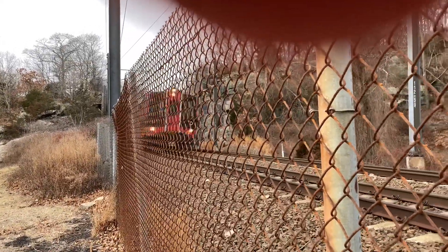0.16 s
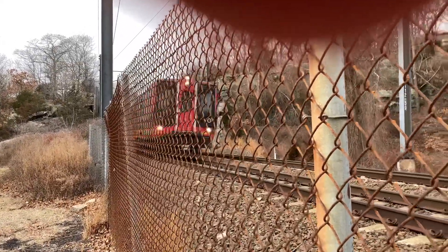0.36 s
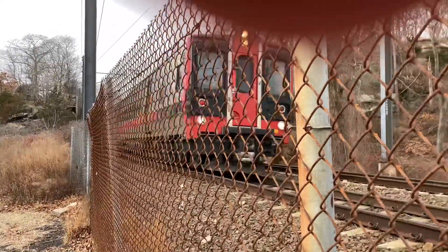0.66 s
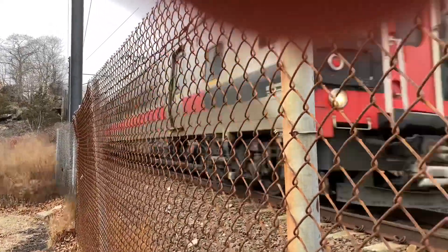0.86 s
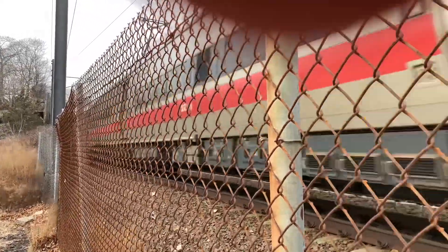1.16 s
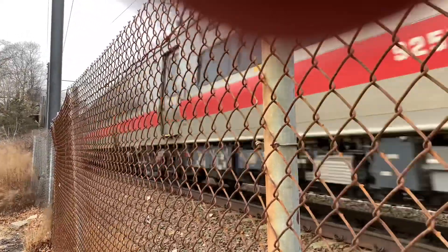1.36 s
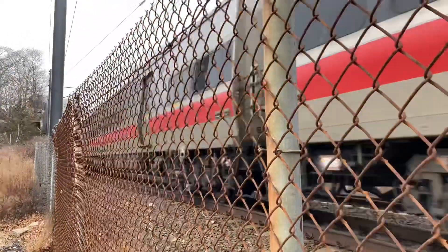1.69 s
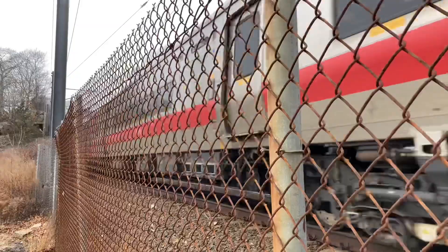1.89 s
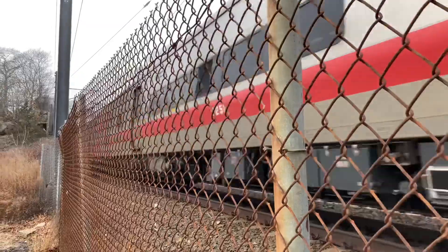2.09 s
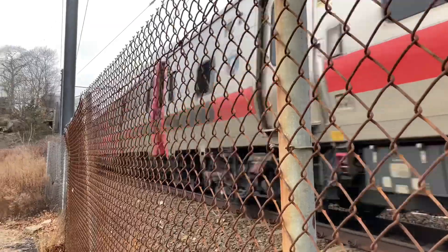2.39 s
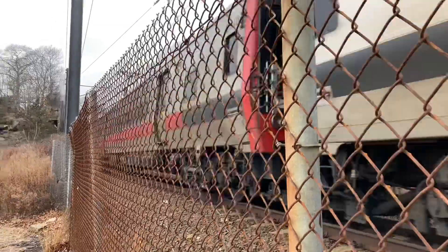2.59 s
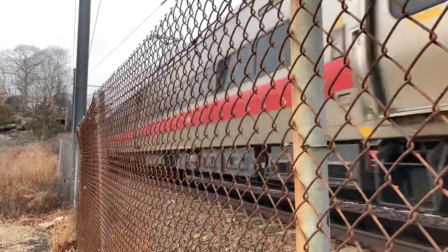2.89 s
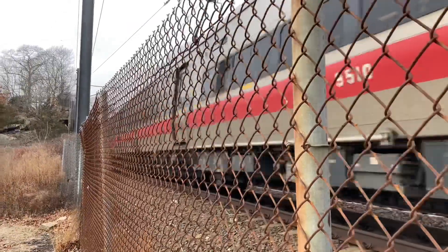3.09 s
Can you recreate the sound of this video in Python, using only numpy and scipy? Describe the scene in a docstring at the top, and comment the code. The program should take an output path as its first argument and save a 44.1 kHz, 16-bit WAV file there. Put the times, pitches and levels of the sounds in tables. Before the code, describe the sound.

Electric passenger train roars past very close, a flat wheel spot knocking rapidly on the rail

```python
"""Heard first is a wheel knocking over and over through the roar of an electric train running past at 26 m/s,
its axles 6 m from a two-port microphone by a wire fence. Roar, rail song, sleeper boom and ballast drone
are shaped noise; a flat spot on a wheel strikes sagging notes, thuds and clatter. Gear notes slide down
as axles pass, motors whine, loose metal rings, dragged air rumbles and hisses, and a brief bright click sounds."""
import sys
import numpy as np
from scipy import signal
from scipy.fft import rfft, irfft
from scipy.io import wavfile
from scipy.ndimage import map_coordinates

SR = 44100
rng = np.random.default_rng(int(sys.argv[2]) if len(sys.argv) > 2 else 0)


def how_loud(loudness_db):
    """Turn decibels into a plain amplitude multiplier (0 dB gives 1, 20 dB gives 10)."""
    steps = np.asarray(loudness_db, float) / 20
    return 10 ** steps


def int16_out(signal):
    """Quantize to a 16-bit WAV file."""
    q = np.round(np.clip(np.atleast_2d(signal).T, -1, 1) * 32767)
    wavfile.write(sys.argv[1], SR, q.astype(np.int16))


N = 143325
T = np.arange(N) / SR
HZ = np.fft.rfftfreq(N, 1 / SR) + 1e-3   # kept off zero for the logarithm

# Levels are relative, before the trims in the functions.
# moving air: [t/s, rumble level/dB, hiss level/dB, sizzle level/dB]
AIR_LEVELS = [(0.0, -38, -44, -36), (0.09, -30.5, -40, -35), (0.9, -20.5, -34.5, -35.5),
              (1.27, -27.5, -43, -42), (1.88, -35.5, -34.5, -38.5), (2.13, -30, -42, -43.5),
              (2.58, -35, -35.5, -41.5), (2.87, -38, -37.5, -42), (2.94, -31, -37, -43),
              (2.97, -32, -44, -44), (3.13, -28.5, -43, -45), (3.25, -42, -43, -42)]
# colours of the air: [f/Hz, level/dB]
RUMBLE_COLOUR = [(24, -39), (36, -18), (60, -6.5), (90, -9.5), (130, -12.5), (200, -22.5)]
HISS_COLOUR = [(4500, -51), (5800, 1.5), (7000, 5), (8500, 5), (9500, 3.5), (10500, 4)]
SIZZLE_COLOUR = [(8000, -2), (9200, -5), (11200, 5), (12300, -1), (13500, -4), (14500, -1), (16000, -19)]
# brief bright clicks: [t/s, level/dB]; their colour: [f/Hz, level/dB]
BRIGHT_CLICKS = [(0.3905, -15), (.3935, -21)]
CLICK_COLOUR = [(6000, -25), (8500, -16), (11500, 5), (15000, -6), (16500, -20)]
# loose metal parts ringing: [t/s, level/dB, f/Hz]
METAL_RINGS = [(2.125, -27.5, 5400), (2.6, -30, 5480), (2.6, -31, 4700), (3.015, -27, 5340)]
# geared axles going by: [t of closest approach/s, level/dB, f at the source/Hz]
AXLE_PASSES = [(0.722, -48, 2870), (0.961, -28.5, 3005), (1.099, -35.5, 2770), (1.102, -37, 3310),
               (1.662, -34.5, 2870), (1.72, -36, 3467), (1.93, -30.5, 2940), (1.85, -32.5, 3330),
               (2.629, -38, 2880), (2.929, -33.5, 2900)]
# nearness of the motors: [t/s, whine level/dB, gear rush level/dB]
MOTOR_LEVELS = [(0.0, -45.5, -42), (0.6, -44.5, -35.5), (0.7, -41, -33.5), (0.89, -33, -30),
                (1.05, -30, -31.5), (1.19, -31.5, -35), (1.53, -43, -39), (1.59, -34, -32.5),
                (1.79, -38, -32), (1.99, -34, -32.5), (2.06, -33.5, -34.5), (2.22, -45, -41.5),
                (2.45, -47, -38), (2.67, -31, -33.5), (2.78, -45, -33.5), (2.93, -33, -34),
                (3.09, -32.5, -41), (3.16, -43, -40)]
# whine resonances: [f/Hz, width/Hz, level/dB]; colour of the rush: [f/Hz, level/dB]
WHINE_PEAKS = [(2852, 53, 1), (3374, 29, -9), (7310, 77, -11)]
RUSH_COLOUR = [(1050, -55), (1450, 10.5), (1950, -16), (2350, -1.5), (2900, 1.5), (3400, 1.5), (4200, -1),
               (5200, 0.5), (6500, -5), (8000, -15)]
# nearness of the wheels: [t/s, roar level/dB, rail song level/dB, sleeper boom level/dB, ballast drone level/dB]
WHEEL_LEVELS = [(0, -26, -29, -38, -42.5), (.08, -29.5, -24, -35.5, -48), (.55, -24.5, -22, -29.5, -44),
                (.68, -24.5, -15, -26, -37.5), (.8, -22.5, -17, -24, -32.5),
                (.87, -21.5, -20.5, -15, -29.5), (.97, -21, -24, -22.5, -25.5),
                (1.16, -26.5, -30.5, -18.5, -50), (1.4, -24.5, -27.5, -28, -36),
                (1.7, -19, -27.5, -25.5, -30.5), (1.9, -23.5, -26, -20.5, -29.5),
                (2.2, -25.5, -28.5, -45, -37.5), (2.43, -23.5, -33.5, -30, -34.5),
                (2.6, -21.5, -28, -31, -33), (2.73, -19, -22.5, -16.5, -28.5), (2.92, -24, -48, -12, -28),
                (3.06, -28.5, -30.5, -24.5, -32.5), (3.25, -24.5, -28, -60, -39)]
# colours of rolling: [f/Hz, level/dB]
ROAR_COLOUR = [(330, -9), (420, -1.5), (700, -1), (1050, 1), (1400, -3.5), (1950, -3.5), (2300, -17.5),
               (3000, -27.5)]
BALLAST_COLOUR = [(80, -6.5), (125, -5.5), (200, 4), (330, -3.5), (420, -4.5), (520, -14.5)]
# resonances fed by rough rolling: [f/Hz, width/Hz, level/dB]
RAIL_PEAKS = [(480.5, 55, 1.5), (600, 54, -7), (1076, 29, -11)]
SLEEPER_PEAKS = [(189, 26, 4.5), (209, 95, 4), (245, 28.5, 8.5)]
# wheel-flat knocks: [t/s, peak level/dB, nominal f/Hz, thud level/dB, clatter level/dB]
FLAT_KNOCKS = [(0.081, -10, 1170, -40, -36), (0.118, -15.5, 478, -31, -40), (0.18, -8, 858, -40, -46),
               (0.229, -15, 977, -30, -48), (0.278, -15, 720, -39, -50), (0.332, -16, 610, -18.5, -41),
               (0.371, -6, 700, -26, -50), (0.469, -33, 510, -17.5, -26), (0.561, -10.5, 600, -15, -28),
               (0.657, -5, 610, -12, -35), (0.681, -27, 470, -23, -39), (0.709, -8.5, 780, -19, -29),
               (0.754, -7.5, 600, -12.5, -39), (0.811, -12, 506, -28, -23), (0.848, -9.5, 600, -19, -33),
               (0.896, -7.5, 680, -8, -17.5), (0.988, -7.5, 750, -8.5, -26), (1.082, -8, 783, -10.5, -20),
               (1.18, -12.5, 630, -12, -23), (1.274, -22, 635, -13, -26), (1.367, -12, 647, -35, -24),
               (1.473, -12.5, 547, -27, -19.5), (1.557, -7, 590, -14, -19), (1.65, -11, 917, -29, -18),
               (1.765, -5, 597, -7.5, -18.5), (1.855, -4.5, 552, -11, -23),
               (1.933, -5.5, 732, -15.5, -19.5), (2.023, -22, 816, -13, -39),
               (2.117, -15.5, 827, -15.5, -26), (2.153, -8.5, 580, -16, -39), (2.243, -6.5, 593, -18, -26),
               (2.341, -8, 525, -12, -21), (2.423, -9.5, 733, -7.5, -21.5), (2.513, -5.5, 614, -3, -21),
               (2.603, -11, 630, -7.5, -23), (2.701, -17, 587, -9.5, -42), (2.739, -6, 513, -21, -30),
               (2.812, -10, 500, -7.5, -22), (2.916, -12, 600, -5, -19.5), (3.019, -4.5, 595, -12, -29.5),
               (3.112, -7.5, 594, -11, -24), (3.213, -10, 934, -12.5, -27)]
# overtones of a knock: [multiple of the note, level/dB]
KNOCK_OVERTONES = [(1.3, -7.5), (1.65, -8.5), (2.1, -14.5)]
# colours of a knock: [f/Hz, level/dB]
KNOCK_COLOUR = [(250, -9), (450, -8), (650, 4.5), (950, 4.5), (1400, 0.5), (2000, -9.5)]
THUD_COLOUR = [(90, -4.5), (150, 7), (220, 1), (380, 4.5), (550, -11)]
CLATTER_COLOUR = [(900, -7.5), (1400, 9.5), (2000, -0.5), (3200, -10), (6000, -11), (11000, -20),
                  (15000, -35)]
# power share of the sound that comes straight to both ports: [f/Hz, share 0-1]
DIRECT_SHARE = [(30, .965), (90, .97), (250, .95), (640, .9), (1400, .65), (2800, .5), (4500, .4),
                (6000, .6), (7000, .97), (11000, .98)]
# bearing of the direct sound below the crossover: [t/s, lag of the left port/ms]
LEFT_LAG = [(0, -0.17), (.5, -0.14), (.8, 0.018), (1.1, 0.34), (2, 0.31), (3.25, 0.35)]
# phase by which the left port trails in the treble, in steps: [f/Hz, phase/turns]
TREBLE_PHASE = [(3500, 1.05), (5100, 1.52), (6450, 1.97), (7450, 2.03), (8400, 2.46), (9600, 2.53),
                (10600, 2.96), (12200, 3.03), (12800, 3.46), (14300, 3.54), (14900, 3.96), (17000, 4.02)]
# balance of the ports: [f/Hz, left minus right level/dB]
PORT_BALANCE = [(60, -1), (110, 0.5), (200, 0), (380, 2.5), (700, -3.5), (1290, 1.5), (2380, -0.5),
                (4400, 2.5), (8120, -1.5), (15000, 2.5)]


def rms_one(x):
    """Scale to unit rms."""
    return x / np.sqrt(np.mean(x ** 2) + 1e-20)


def in_time(rows):
    """Columns of a table as curves over time."""
    s, *columns = np.transpose(rows)
    return [np.interp(T, s, column) for column in columns]


def at_hz(points, hz):
    """Read a table on a log-frequency axis."""
    f, value = np.transpose(points)
    return np.interp(np.log(hz), np.log(f), value)


def spectrum(points):
    """Gain over frequency, silent beyond the ends of the table."""
    return how_loud(at_hz(points, HZ)) * (HZ > points[0][0]) * (HZ < points[-1][0])


def drift(rate_hz):
    """Chance wandering of spread 1, smoothed by two equal poles at the given rate."""
    r = np.exp(-80 * np.pi * rate_hz / SR)   # runs at a fortieth of the sample rate
    slow = signal.lfilter([1], [1, -2 * r, r * r], rng.standard_normal(N // 40 + 2002))[2000:]
    return np.interp(np.arange(N) / 40, np.arange(len(slow)), rms_one(slow))


def noise(gain):
    """Three unrelated noises of one colour: the direct path and the scatter at each port."""
    size = (3, len(HZ))
    chance = rng.standard_normal(size) + 1j * rng.standard_normal(size)
    return rms_one(irfft(gain * chance, N))


def coloured(points):
    """Noise under a tabled spectrum."""
    return noise(spectrum(points))


def patchy(points, patchy_db, rate_hz, count):
    """Noise whose overlapping bands flicker on their own."""
    centres = np.linspace(np.log(points[0][0]), np.log(points[-1][0]), count)
    whole = spectrum(points)
    out = 0
    for k in range(count):
        share = np.interp(np.log(HZ), centres, np.arange(count) == k)
        part = whole * np.sqrt(share)
        band = noise(part) * np.sqrt(np.sum(part ** 2))
        out = out + band * how_loud(patchy_db * drift(rate_hz))
    return rms_one(out)


def singing(peaks, waver_db, rate_hz):
    """Noise through steep resonances, wavering in level."""
    power = sum(how_loud(2 * db) / w / (1 + (2 * (HZ - hz) / w) ** 2) ** 2 for hz, w, db in peaks)
    return noise(np.sqrt(power)) * how_loud(waver_db * drift(rate_hz))


def bursts(times, db, rise_s, t60_s):
    """Envelope that swells and dies at each given time."""
    out = np.zeros(N)
    for s, gain in zip(times, how_loud(db)):
        t = np.maximum(T - s, 0)
        out += gain * (1 - np.exp(-(t / rise_s) ** 2)) * how_loud(-60 * t / t60_s)
    return out


def throb(db):
    """The out-of-round wheel leans harder on the rail around each knock: an even rise and fall."""
    delay_s, spread_s = 0.0037, 0.013
    s = np.transpose(FLAT_KNOCKS)[0]
    gains = how_loud(db * np.ones_like(s))
    return sum(g * np.exp(-((T - at - delay_s) / spread_s) ** 2) for at, g in zip(s, gains))


def air():
    """Low lumpy rumble, hiss and top sizzle of air dragged by the train."""
    rumble_db, hiss_db, sizzle_db = in_time(AIR_LEVELS)
    rumble = how_loud(rumble_db) * coloured(RUMBLE_COLOUR) * how_loud(1.55 * drift(29.0))
    hiss = how_loud(hiss_db + 2.5) * patchy(HISS_COLOUR, patchy_db=3.0, rate_hz=9.8, count=2)
    sizzle = how_loud(sizzle_db) * patchy(SIZZLE_COLOUR, patchy_db=1.0, rate_hz=40.0, count=3)
    return rumble + hiss + sizzle


def bright_click():
    """A brief bright click: short bursts of treble noise, unalike at each port."""
    s, db = np.transpose(BRIGHT_CLICKS)
    return bursts(s, db, rise_s=0.00034, t60_s=0.014) * coloured(CLICK_COLOUR)[1:]


def rattles():
    """Short rough rings of loose metal under the cars: noise through one resonance each."""
    width_hz = 470
    out = 0
    for s, db, hz in METAL_RINGS:
        ring = noise(1 / (1 + (2 * (HZ - hz) / width_hz) ** 2))
        out = out + bursts([s], np.array([db]), rise_s=0.0057, t60_s=0.24) * ring
    return out


def axles():
    """A rough flickering gear note per axle, swelling and Doppler-sliding down as it goes by."""
    speed_m_s, sound_m_s, distance_m = 26, 343, 6.0
    aim = 5.4   # power of distance by which the level falls
    rough_hz, flicker_db, flicker_hz = 150, 3, 14
    out = 0
    for s, db, hz in AXLE_PASSES:
        along = speed_m_s * (T - s)
        r = np.hypot(along, distance_m)
        heard_hz = hz / (1 + speed_m_s * along / r / sound_m_s)
        carrier = np.exp(2j * np.pi * np.cumsum(heard_hz) / SR)
        rough = np.array([drift(rough_hz) + 1j * drift(rough_hz) for path in range(3)])
        level = how_loud(db + flicker_db * drift(flicker_hz)) * (distance_m / r) ** aim
        out = out + level * (rough * carrier).real
    return out


def motors():
    """Narrow whine of the traction gear over a rush."""
    whine_db, rush_db = in_time(MOTOR_LEVELS)
    whine = how_loud(whine_db) * singing(WHINE_PEAKS, waver_db=3, rate_hz=16)
    rush = how_loud(rush_db + 5.0) * patchy(RUSH_COLOUR, patchy_db=2.0, rate_hz=14.0, count=14)
    return whine + rush


def rolling():
    """Roar of wheel on rail, the rail's song, the boom of the sleepers and the drone of the ballast."""
    roar_db, rail_db, boom_db, drone_db = in_time(WHEEL_LEVELS)
    roar_throb, rail_throb = 0.21, 0.3   # shares that throb with the wheel turn
    roar = how_loud(roar_db + 3.5) * patchy(ROAR_COLOUR, patchy_db=2.5, rate_hz=16.6, count=14)
    roar = roar * (1 - roar_throb + roar_throb * throb(1.6))
    song = how_loud(rail_db + 0.5) * singing(RAIL_PEAKS, waver_db=3, rate_hz=13.0)
    song = song * (1 - rail_throb + rail_throb * throb(1.8))
    boom = how_loud(boom_db - 4.5) * singing(SLEEPER_PEAKS, waver_db=4.0, rate_hz=4.5)
    drone = how_loud(drone_db + 8.0) * patchy(BALLAST_COLOUR, patchy_db=2.5, rate_hz=27.0, count=2)
    return roar + song + boom + drone


def swells():
    """Extra roar that leans in with every knock, following its peak level."""
    peak_db = np.transpose(FLAT_KNOCKS)[1]
    return throb(peak_db - 15) * coloured(ROAR_COLOUR)


def knock_notes():
    """Each blow's note and overtones slide down as it spreads along the rail; a bounce follows."""
    rise_s, t60_s, sag_per_s = 0.0012, 0.05, 23.63
    trim_db, bounce_s, bounce_db = -0.5, 0.014, -5.5
    stray_share, stray_db = 0.0945, 4   # chance spread of overtone pitch and level
    follow = 0.32   # share of the clatter's level over the blow that overtones follow
    top_hz = 1700   # the rail hardly rings above this
    s, peak_db, pitch_hz, _, clatter_db = np.transpose(FLAT_KNOCKS)
    bright_db = clatter_db - peak_db
    lift_db = follow * (bright_db - bright_db.mean())
    multiple, level_db = np.transpose([(1, 0.0039)] + KNOCK_OVERTONES)
    is_overtone = multiple > 1
    size = int(.08 * SR)
    t = np.arange(size) / SR
    shape = (1 - np.exp(-(t / rise_s) ** 2)) * how_loud(-60 * t / t60_s)
    glide = (1 - np.exp(-sag_per_s * t)) / sag_per_s   # integral of the sagging pitch
    out = np.zeros((3, N + SR))
    for at, db, f, lift in zip((s * SR).astype(int), peak_db, pitch_hz, lift_db):
        stray = rng.standard_normal((2, len(multiple))) * is_overtone
        phase = rng.uniform(0, 1, (3, len(multiple), 1))
        ratios = multiple * (1 + stray_share * stray[0])
        tones = np.sin(2 * np.pi * (1.2 * f * np.outer(ratios, glide) + phase))
        weights = how_loud(level_db + stray_db * stray[1] + lift * is_overtone)
        weights = weights / (1 + (multiple * f / top_hz) ** 6)
        out[:, at:at + size] += how_loud(db + trim_db) * shape * (weights @ tones)

        at += int(bounce_s * (0.729 + 0.692 * rng.uniform()) * SR)
        bounce_hz = (0.853 + 0.876 * rng.uniform()) * f
        bounce = np.sin(2 * np.pi * (bounce_hz * glide + rng.uniform(0, 1, (3, 1))))
        out[:, at:at + size] += how_loud(db + trim_db + bounce_db) * shape * bounce
    return out[:, :N]


def wheel_flat():
    """The flat spot strikes the rail: notes with a noisy rattle, a late thud and bright clatter."""
    s, peak_db, _, thud_db, clatter_db = np.transpose(FLAT_KNOCKS)
    rattle = bursts(s, peak_db - 6.5, rise_s=0.0052, t60_s=0.12) * coloured(KNOCK_COLOUR)
    thud = bursts(s + 0.0038, thud_db, rise_s=0.012, t60_s=0.13) * coloured(THUD_COLOUR)
    clatter = bursts(s, clatter_db, rise_s=0.0012, t60_s=0.35) * coloured(CLATTER_COLOUR)
    return knock_notes() + rattle + thud + clatter


def scene():
    """Direct sound reaches the ports at different times; scatter from fence and ballast differs at each."""
    crossover_hz = 4630
    train = air() + rattles() + axles() + motors() + rolling() + swells() + wheel_flat()
    direct, left, right = train
    lag_ms, = in_time(LEFT_LAG)
    late = map_coordinates(direct, [np.arange(N) - lag_ms * SR / 1000], order=3, mode="nearest")
    low = 1 / (1 + (HZ / crossover_hz) ** 12)
    at_right = rfft(direct)
    turned = at_right * np.exp(-2j * np.pi * np.interp(HZ, *np.transpose(TREBLE_PHASE)))
    at_left = low * rfft(late) + (1 - low) * turned
    share = at_hz(DIRECT_SHARE, HZ)
    scatter = rfft(np.array([left, right]))
    mix = np.sqrt(share) * np.array([at_left, at_right]) + np.sqrt(1 - share) * scatter
    balance = how_loud(at_hz(PORT_BALANCE, HZ) / 2 * np.array([[1], [-1]]))   # half to each port
    return irfft(mix * balance, N) + bright_click()


def roll_off(x):
    """The treble ends steeply here."""
    return signal.sosfilt(signal.butter(12, 17060, fs=SR, output="sos"), x)


def record(dry):
    """Peaks are softly rounded."""
    mix = 1.035 * np.tanh(dry / 1.086)
    return roll_off(mix)


dry = scene()
out = record(dry)
int16_out(out)
```